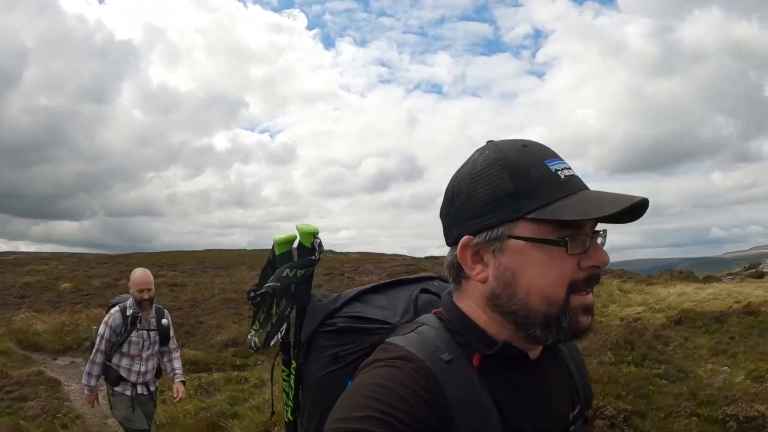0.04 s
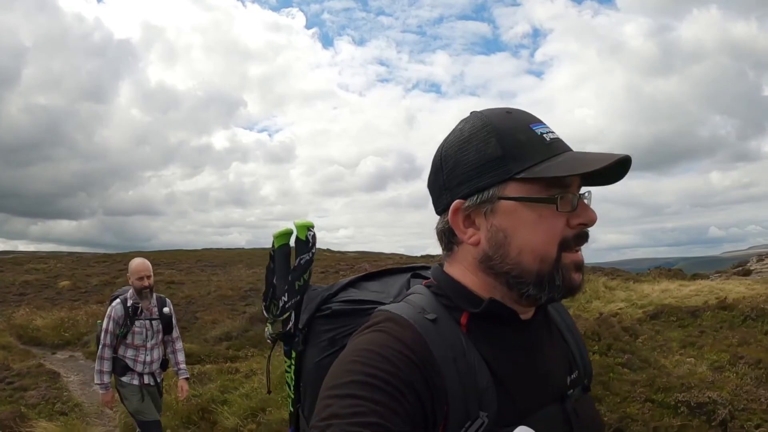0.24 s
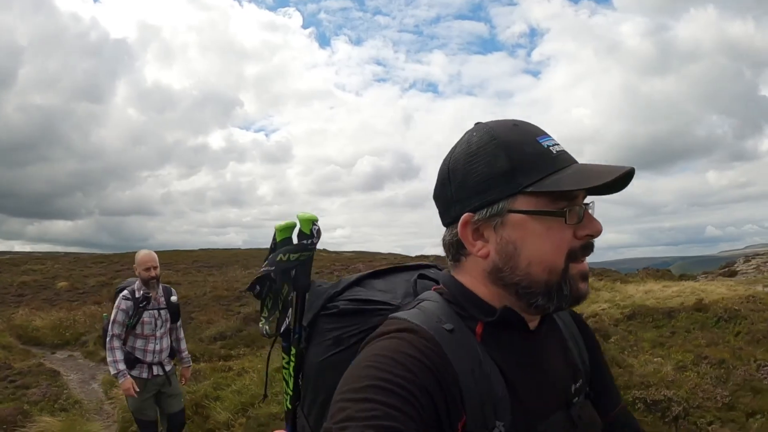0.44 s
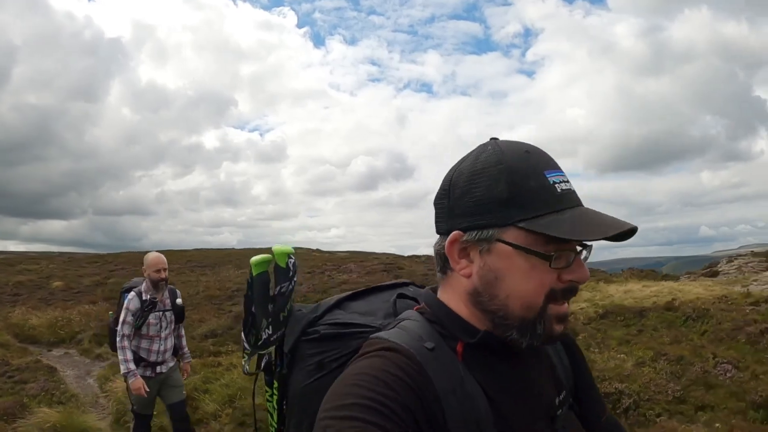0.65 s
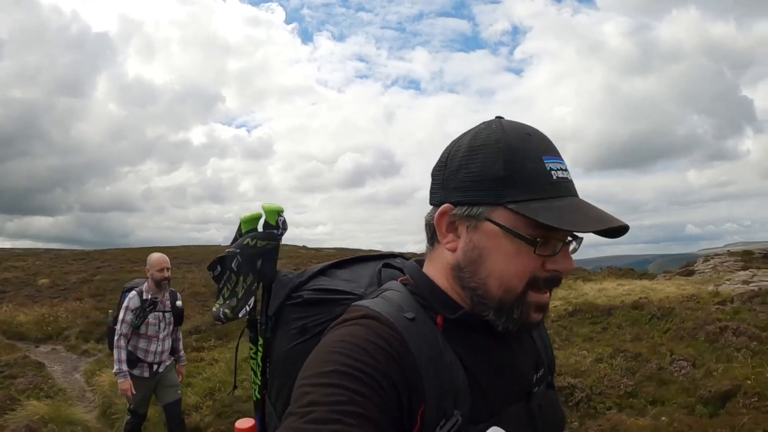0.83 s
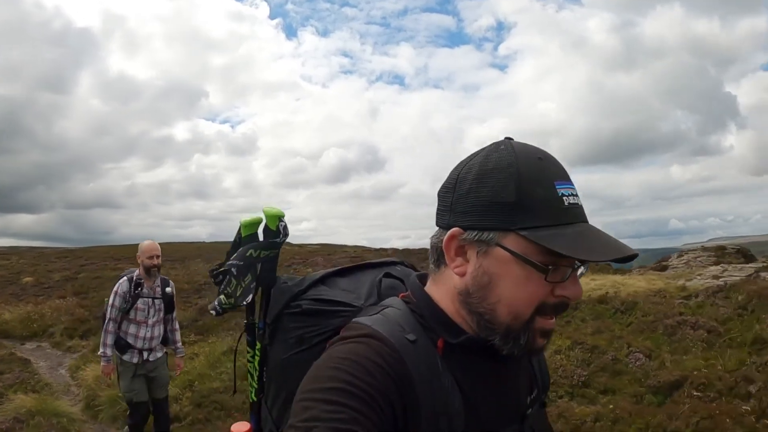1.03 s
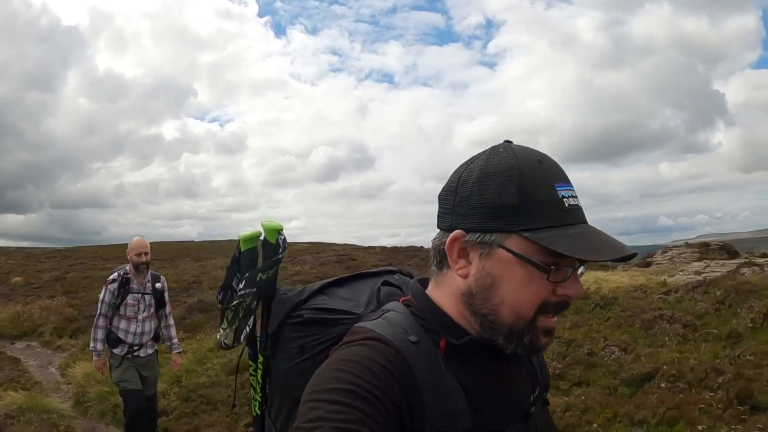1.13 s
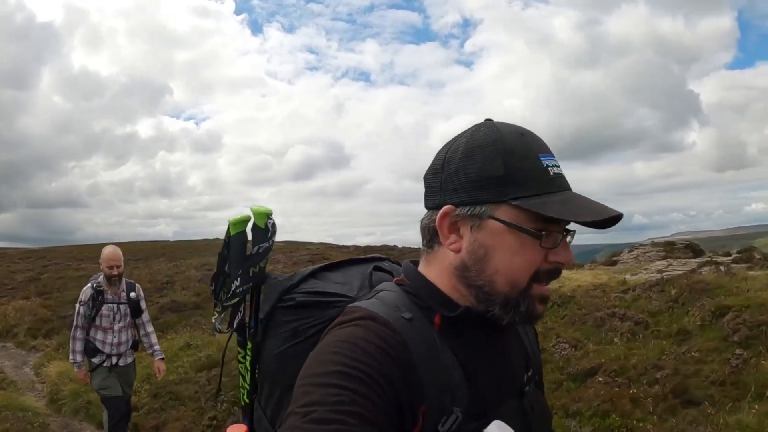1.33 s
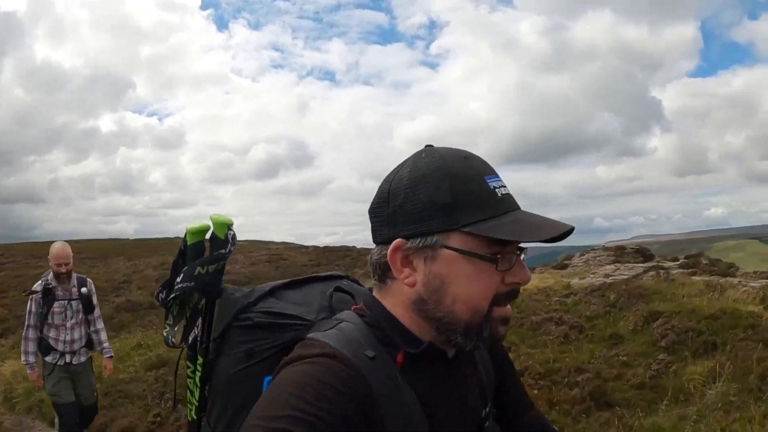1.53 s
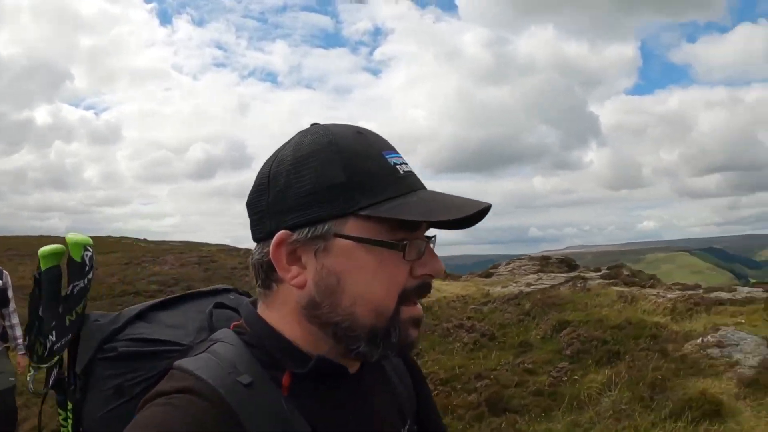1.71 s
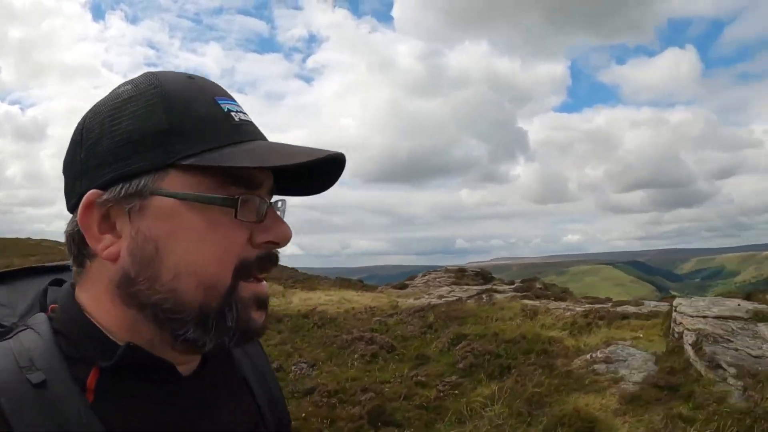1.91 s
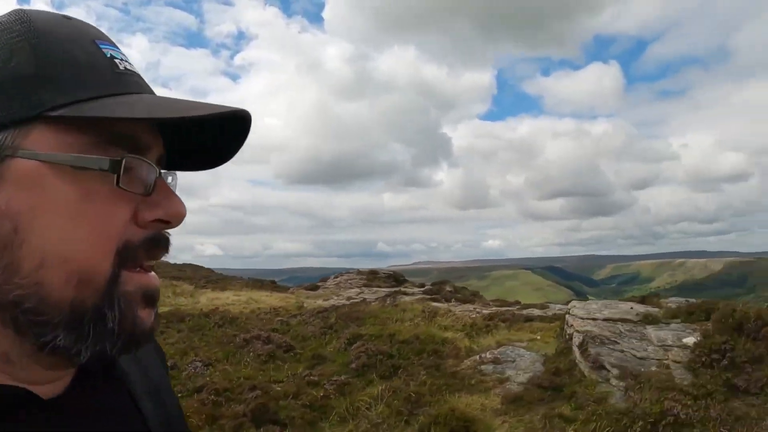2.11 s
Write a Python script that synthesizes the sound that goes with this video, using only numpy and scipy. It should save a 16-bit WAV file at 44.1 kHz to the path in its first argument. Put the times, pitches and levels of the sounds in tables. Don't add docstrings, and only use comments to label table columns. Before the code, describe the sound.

Strong wind buffets a bare handheld camera microphone on open moorland: lumpy low rumble and dull thumps from the start, hardest gust midway, another near the end, with thin heather hiss and tiny strap ticks beneath.

```python
import sys
import numpy as np
from scipy import signal
from scipy.fft import rfft, irfft
from scipy.io import wavfile
from scipy.ndimage import uniform_filter1d

SR = 44100
rng = np.random.default_rng(int(sys.argv[2]) if len(sys.argv) > 2 else 0)


def linear_from_db(decibels):
    return 10 ** (np.asarray(decibels, float) / 20)


def wrap_up_sound(samples):
    columns = np.atleast_2d(samples).T
    tamed = np.clip(columns, -1, 1)
    steps = np.round(tamed * 32767).astype(np.int16)
    wavfile.write(sys.argv[1], SR, steps)


N = 95256


def evened(x):
    return x / np.sqrt(np.mean(x ** 2) + 1e-20)


def on_hz(points, hz):
    f, value = np.transpose(points)
    return np.interp(np.log(hz + 1), np.log(f + 1), value)


def in_time(points):
    s, value = np.transpose(points)
    return np.interp(np.arange(N) / SR, s, value)


def smooth_chance(seconds):
    f = np.fft.rfftfreq(N, 1 / SR)
    wander = rfft(rng.standard_normal(N)) * np.exp(-(f * seconds) ** 2)
    return evened(irfft(wander, N))


def bells(rows, gain):
    grid_s = np.arange(0, N / SR + .002, .001)
    peak_s, height_db, half_s = np.transpose(rows)[:, :, None]
    total = (gain(height_db) * np.exp(-((grid_s - peak_s) / half_s) ** 2)).sum(0)
    return np.interp(np.arange(N) / SR, grid_s, total)


def flips(rows, gain_db, cycles):
    out = np.zeros(N)
    phases = rng.uniform(0, 2 * np.pi, (len(rows), 1))
    for (onset_s, peak_db, pitch_hz), phase in zip(rows, phases):
        first = max(int((onset_s - 3 * cycles / pitch_hz) * SR), 0)
        last = min(int((onset_s + 5 * cycles / pitch_hz) * SR), N)
        at = np.arange(first, last)
        u = (at / SR - onset_s) * pitch_hz - cycles
        bell = np.exp(-.5 * (u / cycles) ** 2)
        out[at] += linear_from_db(peak_db + gain_db) * bell * np.cos(2 * np.pi * u + phase)
    return out


# peak_s, strength_db, half_length_s
GUST_ROWS = [(0.022, -49, 0.089), (0.078, -39.5, 0.005), (0.127, -35, 0.0069), (0.155, -34.5, 0.014),
             (0.182, -47.5, 0.056), (0.225, -43, 0.024), (0.32, -40, 0.01), (0.345, -39.5, 0.015),
             (.44, -29.5, .006), (0.545, -32.5, .004), (0.691, -37, 0.0062), (0.783, -23, .006),
             (.885, -32.5, .005), (0.944, -36.5, 0.0045), (1.041, -29, 0.011), (1.204, -29, 0.0055),
             (1.395, -33.5, .005), (1.495, -38, 0.006), (1.601, -40, 0.0092), (1.654, -38.5, 0.0086),
             (1.717, -23, 0.013), (1.755, -34, 0.011), (1.902, -38.5, 0.0067), (2.064, -37, 0.0064),
             (0.37, -33, 0.024), (0.417, -31.5, 0.025), (0.485, -29.5, 0.0098), (0.512, -31.5, 0.045),
             (0.6, -25, 0.014), (0.664, -33, 0.054), (0.802, -23.5, 0.029), (0.866, -28, 0.021),
             (0.915, -37.5, 0.013), (1.016, -17, 0.015), (1.06, -25.5, 0.0094), (1.111, -26.5, 0.021),
             (1.174, -25, 0.012), (1.233, -27.5, 0.029), (1.291, -31, 0.012), (1.349, -28.5, 0.025),
             (1.48, -48.5, 0.089), (1.539, -31.5, 0.026), (1.698, -31.5, 0.026), (1.778, -28, 0.0029),
             (1.852, -34, 0.006), (1.931, -32, 0.02), (2.03, -31, 0.014), (2.13, -38.5, 0.04)]
CALM_DB, GUST_REF_DB, GUST_DB_PER_SPEED_OCTAVE = -49, -35, 18
FLUTTER_OCT, FLUTTER_S = 0.14, 0.0038


def air_speed():
    power = linear_from_db(CALM_DB) ** 2 + bells(GUST_ROWS, lambda db: linear_from_db(2 * db))
    octaves = (10 * np.log10(power) - GUST_REF_DB) / GUST_DB_PER_SPEED_OCTAVE
    return 2 ** (octaves + FLUTTER_OCT * smooth_chance(FLUTTER_S))


# time_s, change_db
MID_PUSH = [(0, 5), (.15, -3.5), (.28, 0), (.4, 1), (.6, -3), (.72, 0.5), (.8, -2), (.9, -10), (.95, -3.5),
            (1.08, -6), (1.2, -6), (1.34, 0.5), (1.45, 1.5), (1.58, 1), (1.68, 4.5), (1.76, 3.5),
            (1.85, -3), (2.16, 1)]
# peak_s, change_db, half_length_s
MID_BUNCHES = [(0.089, 7, 0.0054), (0.104, -4.5, 0.013), (0.137, 3.5, 0.022), (0.173, 4.5, 0.013),
               (0.232, 3, 0.0072), (0.272, 1, .02), (0.326, 3.5, 0.004), (0.371, 0, 0.027),
               (0.461, -8.5, .01), (0.496, 5.5, 0.0084), (0.544, 5, .01), (0.642, -4, 0.015),
               (0.694, 6.5, 0.0068), (0.72, -10, 0.017), (0.783, -1.5, 0.022), (0.916, -8, .015),
               (0.932, 9, 0.0045), (.965, 2, .012), (1.004, 4.5, 0.027), (1.101, -6, 0.018),
               (1.222, 6, 0.023), (1.257, -6, .012), (1.34, 2.5, 0.0021), (1.421, 4.5, 0.014),
               (1.461, 6.5, 0.0067), (1.477, -12, 0.0053), (1.546, 1, 0.019), (1.574, -16, 0.011),
               (1.6, 0.5, .006), (1.624, 5.5, .012), (1.651, -0.5, .008), (1.698, 1, 0.0075),
               (1.737, -19, .006), (1.751, 2, 0.0082), (1.797, -3.5, 0.025), (1.855, 6, 0.0041),
               (1.87, -1, 0.0088), (1.952, 3, .012), (1.991, 2, 0.01), (2.031, -3, 0.0072), (2.065, 4, .01),
               (2.112, -4.5, 0.0081)]
THROB_DB, THROB_S = 0.47, 0.012


def mid_eddy_push():
    return in_time(MID_PUSH) + bells(MID_BUNCHES, np.array) + THROB_DB * smooth_chance(THROB_S)


# frequency_hz, density_db_per_hz
EDDY_SPECTRUM = [(15, -7.5), (40, 1.5), (130, -5.5), (300, -10.5), (450, -17.5), (900, -31.5),
                 (1800, -54.5), (4000, -74)]
# peak_s, change_db, half_length_s
BIG_HEAVES = [
    (.15, 3, 0.02),
    (.39, 2.5, 0.033),
    (.5, -3, .025),
    (.79, 4.5, 0.018),
    (1.09, -5, .02),
    (1.17, 7, 0.025),
    (1.42, 4, .03),
    (1.56, -5, .025),
    (1.91, -5.5, 0.036),
    (2.13, 4.5, 0.018),
]
BUFFET_DB = -18
PUSH_HZ, PUSH_OCT, HEAVE_HZ = 291.6, 1, 110
LUMP_DB, LUMP_CYCLES, LUMP_FROM_HZ = 3, 1.92, 100
EVEN_HZ, EVEN_SHARE, EVEN_CYCLES = 199, .7, 2


def buffet():
    speed, push, heave = air_speed(), mid_eddy_push(), bells(BIG_HEAVES, np.array)
    f, out = np.fft.rfftfreq(N, 1 / SR), np.zeros(N)
    white = rfft(rng.standard_normal(N))
    for hz in 12 * 2 ** (np.arange(27) / 3):
        offset = np.clip(3 * np.log2((f + 1) / hz), -1, 1)
        band = irfft(white * np.cos(np.pi / 2 * offset) ** 2, N)
        reach = int(EVEN_CYCLES * SR / hz)
        swing = uniform_filter1d(uniform_filter1d(band ** 2, size=reach), size=reach)
        swing = abs(swing) / np.mean(band ** 2)
        band = band / (swing + 0.15) ** (EVEN_SHARE / 2 / (1 + (hz / EVEN_HZ) ** 2))
        level_db = on_hz(EDDY_SPECTRUM, hz / speed)
        lumps_db = LUMP_DB * hz / (hz + LUMP_FROM_HZ) * smooth_chance(LUMP_CYCLES / hz)
        push_db = push * np.exp(-(np.log2(hz / PUSH_HZ) / PUSH_OCT) ** 2)
        heave_db = heave / (1 + (hz / HEAVE_HZ) ** 2)
        out += band * linear_from_db(level_db + lumps_db + push_db + heave_db)
    return linear_from_db(BUFFET_DB) * evened(out)


# peak_s, peak_db, half_length_s
EDGE_ROWS = [
    (0, -16, .005),
    (2.16, -20, .004),
]


def edge_pressure():
    return bells(EDGE_ROWS, linear_from_db)


# frequency_hz, density_db_per_hz
HEATHER_SPECTRUM = [(710, -29), (1200, 0.5), (1940, -6), (2640, -5), (2860, -4.5), (4300, -9), (10700, -29),
                    (13000, -51.5)]
# time_s, level_db, brightness_db_per_octave (above 3 kHz)
HEATHER_SWELL = [(0, -53.5, -2), (0.182, -57, 0.5), (.26, -54, 1), (0.358, -56.5, -2), (0.551, -53, -1),
                 (0.651, -50.5, -0.5), (.77, -49.5, -3), (0.951, -52.5, -3), (1.05, -48.5, -4),
                 (1.201, -53.5, -3.5), (1.28, -65.5, 6), (1.47, -66, 5), (1.582, -56.5, 3),
                 (1.658, -55.5, 0), (1.8, -59.5, 2), (1.87, -63.5, 2), (1.951, -61, 3), (2.16, -55.5, 1.5)]
PATCH_DB = 2


def heather():
    frames, hz = N // 64 + 5, np.fft.rfftfreq(256, 1 / SR)[:, None]
    real, imag, patches = rng.standard_normal((frames, 129, 3)).T
    patches = uniform_filter1d(patches, size=8, axis=0)
    patches = evened(uniform_filter1d(patches, size=16, axis=1))
    s, level_db, bright = np.transpose(HEATHER_SWELL)
    octaves_up = np.log2(np.maximum(hz / 3000, 1))
    tilt_db = np.interp(np.arange(frames) * 64 / SR, s, bright) * octaves_up
    z = (real + 1j * imag) * linear_from_db(on_hz(HEATHER_SPECTRUM, hz) + PATCH_DB * patches + tilt_db)
    hiss = signal.istft(z, nperseg=256, noverlap=192)[1][:N]
    return evened(hiss) * linear_from_db(np.interp(np.arange(N) / SR, s, level_db))


# onset_s, peak_db, pitch_hz
THUMP_ROWS = [(0.018, -13, 135), (0.052, -11.5, 108), (0.114, -4, 122), (0.312, -17.5, 188),
              (0.479, -25, 132), (0.542, -6, 134.5), (0.753, -6, 114), (0.93, -9, 151), (0.982, -7, 102),
              (1.119, -14, 110), (1.209, -15, 103), (1.334, -6, 257), (1.38, -8.5, 205),
              (1.444, -13.5, 179), (1.489, -7.5, 126.5), (1.585, -11, 115), (1.648, -6.5, 157),
              (1.677, -4.5, 230), (1.744, -2.5, 258), (1.844, -17, 104), (1.944, -13, 143),
              (2.053, -18, 105), (2.11, -15, 126)]


def thumps():
    return flips(THUMP_ROWS, gain_db=-7, cycles=.8)


# onset_s, peak_db
SNAP_ROWS = [(0.123, -28), (0.367, -28.5), (0.474, -16.5), (0.545, -20.5), (0.752, -30), (0.775, -26),
             (0.81, -26), (0.883, -25), (1.005, -22), (1.104, -23), (1.163, -14.5), (1.205, -23),
             (1.337, -13.5), (1.369, -15.5), (1.494, -19.5), (1.71, -17), (1.777, -23), (1.85, -23),
             (2.028, -12.5), (2.11, -29)]
SNAP_HZ = 920


def snaps():
    return flips([(s, db, SNAP_HZ) for s, db in SNAP_ROWS], gain_db=-13, cycles=1.0)


# onset_s, peak_db, pitch_hz
TICK_ROWS = [(0.2073, -31.5, 2540), (0.5846, -38, 1600), (0.6, -38.5, 1640), (0.7547, -39, 1840),
             (0.762, -39, 2960), (0.785, -35, 1680), (1.0016, -23, 1640), (1.0706, -31.5, 1630),
             (1.1054, -26, 1760), (1.1805, -26, 1650), (1.2451, -37, 1870), (1.3432, -34, 1600),
             (1.3693, -37, 1640), (1.3992, -30.5, 1790), (1.408, -46, 2410), (1.425, -40, 1940),
             (1.4394, -44, 2700), (1.6756, -41, 1910), (1.699, -36, 1930), (1.713, -28, 1600),
             (1.7243, -33, 2610), (1.775, -48, 1600), (1.8923, -43, 1610), (2.0293, -33, 1790)]


def ticks():
    return flips(TICK_ROWS, gain_db=-3.5, cycles=1)


# peak_s, peak_db, centre_hz, length_s
RUSTLE_ROWS = [(.209, -39, 3020, 0.0037), (.48, -69.5, 8000, 0.0079), (.615, -45, 2720, 0.013),
               (.618, -56.5, 4430, 0.013), (.763, -55, 3200, 0.001), (.8, -50.5, 3020, 0.017),
               (1.004, -38, 3000, 0.00083), (1.107, -53.5, 4430, 0.0044), (1.35, -63.5, 9400, 0.0011),
               (1.399, -55.5, 2500, 0.018), (1.41, -58.5, 5430, 0.024), (1.426, -66.5, 3970, 0.00093),
               (1.712, -46, 3800, .002), (1.727, -46, 2490, 0.0044), (1.025, -53.5, 3440, 0.013),
               (1.186, -48.5, 2200, .004), (1.78, -66, 5480, 0.035), (0.238, -59.5, 2860, 0.016),
               (.94, -48, 1670, 0.012), (1.41, -56.5, 2200, 0.011), (1.6, -57, 1800, 0.0088),
               (1.9, -62, 7060, 0.0011), (.208, -46.5, 1500, 0.0048), (1.7, -52.5, 2200, 0.022),
               (1.913, -57.5, 4570, 0.0046)]
RUSTLE_OCT, CRACKLE_DB, CRACKLE_S = 0.33, 1.1, 0.0066
SHORT_S, SHORT_WIDER = 0.00053, 0.22


def rustles():
    grit = rng.standard_normal(N) * linear_from_db(CRACKLE_DB * smooth_chance(CRACKLE_S))
    t, f, out = np.arange(N) / SR, np.fft.rfftfreq(N, 1 / SR), np.zeros(N)
    spectrum = rfft(grit)
    for peak_s, peak_db, centre_hz, length_s in RUSTLE_ROWS:
        width_oct = RUSTLE_OCT * (1 + SHORT_WIDER * np.exp(-length_s / SHORT_S))
        window = np.exp(-.5 * (np.log2((f + 1) / centre_hz) / width_oct) ** 2)
        band = evened(irfft(spectrum * window, N))
        out += linear_from_db(peak_db) * band * np.exp(-.5 * ((t - peak_s) / length_s) ** 2)
    return out


# onset_s, peak_db, pitch_hz
HIGH_CLICK_ROWS = [
    (.766, -62, 12450),
    (1.235, -68.5, 12000),
    (1.75, -78, 13000),
]


def high_clicks():
    return flips(HIGH_CLICK_ROWS, gain_db=0, cycles=.3)


def scene():
    wind = buffet() + edge_pressure() + heather() + thumps() + snaps()
    return (wind + ticks() + rustles())[None]


CEILING_HZ, CEILING_HZ_PER_DB, CEILING_SLOPE_HZ = 11700, -150, 60


def moving_ceiling(x):
    hz, _, z = signal.stft(x, SR, nperseg=2048, noverlap=1536, boundary="even")
    low_db = 10 * np.log10(np.mean(abs(z[8:60]) ** 2, axis=0) + 1e-14)
    top_db = 10 * np.log10(np.mean(abs(z[350:500]) ** 2, axis=0) + 1e-14)
    masking_db = uniform_filter1d(low_db - top_db, size=3)
    ceiling_hz = CEILING_HZ + CEILING_HZ_PER_DB * (masking_db - np.mean(masking_db))
    z = z / (1 + np.exp(np.clip((hz[:, None] - ceiling_hz) / CEILING_SLOPE_HZ, -30, 30)))
    return signal.istft(z, SR, nperseg=2048, noverlap=1536)[1][None, :N]


def roll_off(x):
    return signal.sosfilt(signal.butter(12, 15670, fs=SR, output="sos"), x)


def record(dry):
    rounded = np.tanh(dry[0])
    return roll_off(moving_ceiling(rounded) + high_clicks())


dry = scene()
out = record(dry)
wrap_up_sound(out)
```